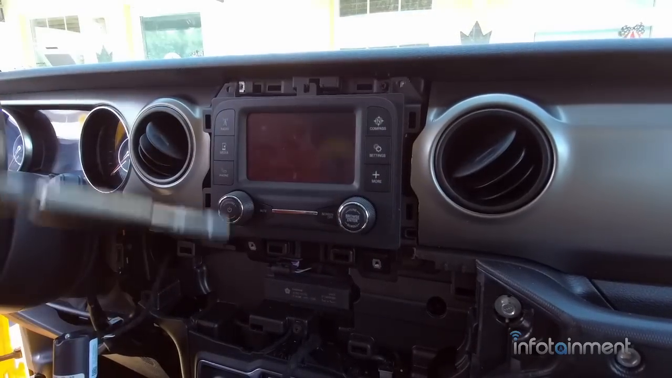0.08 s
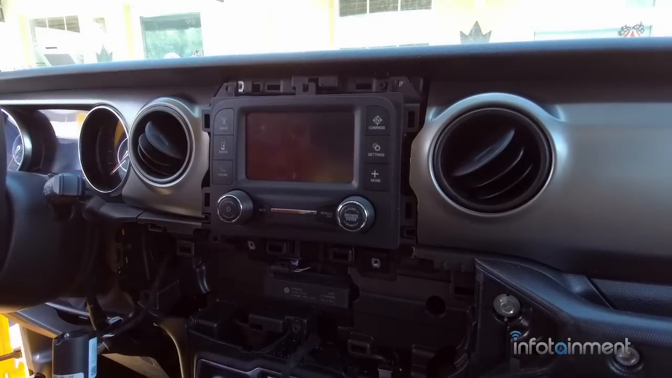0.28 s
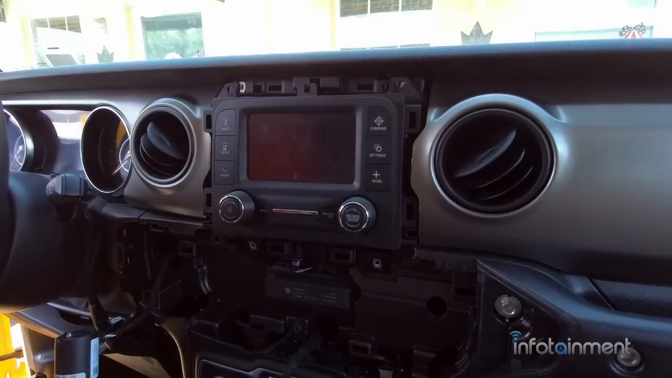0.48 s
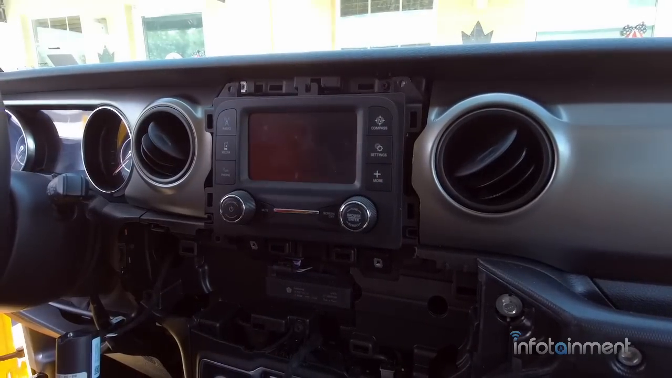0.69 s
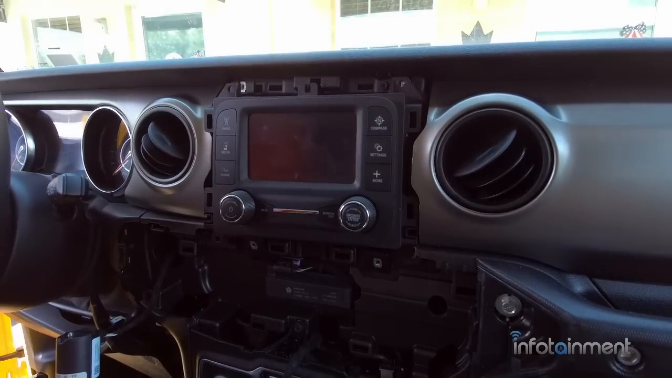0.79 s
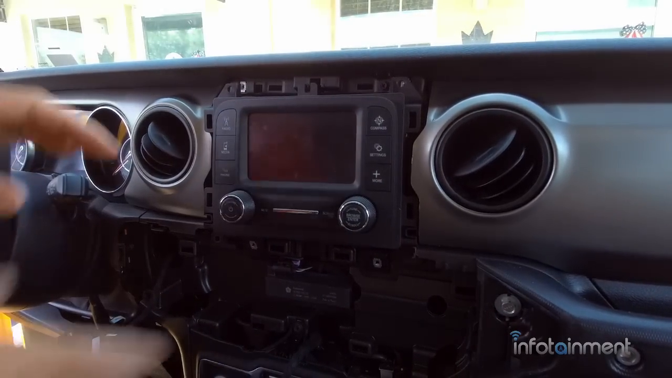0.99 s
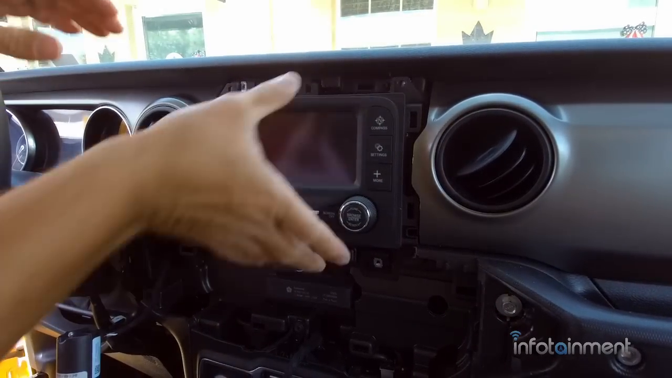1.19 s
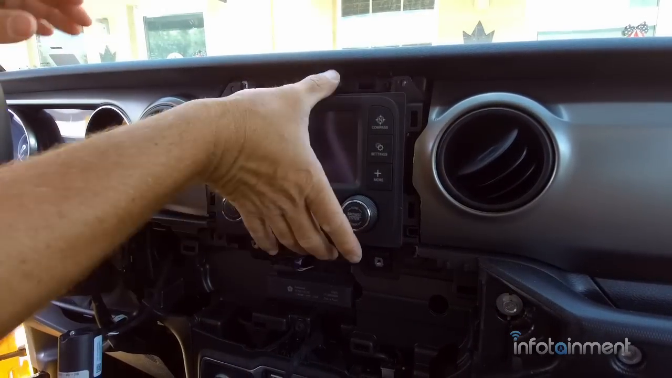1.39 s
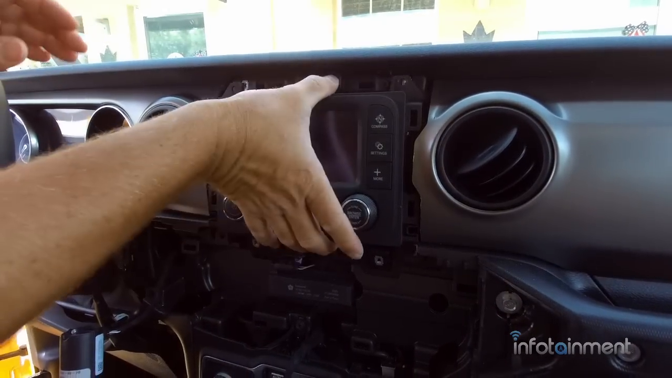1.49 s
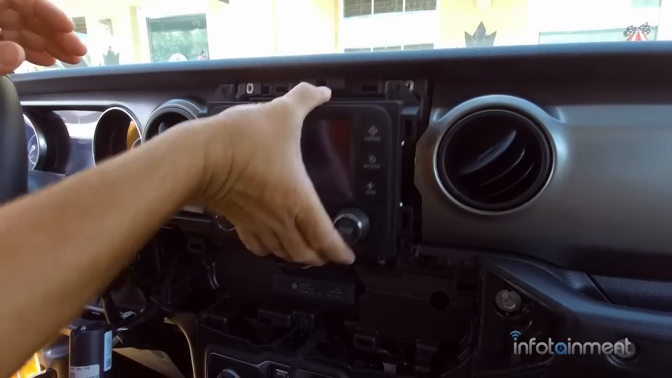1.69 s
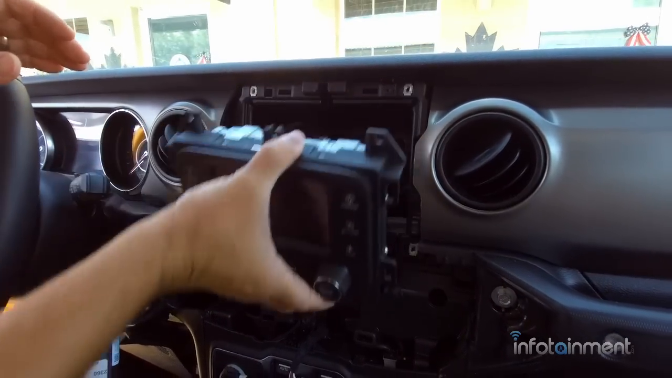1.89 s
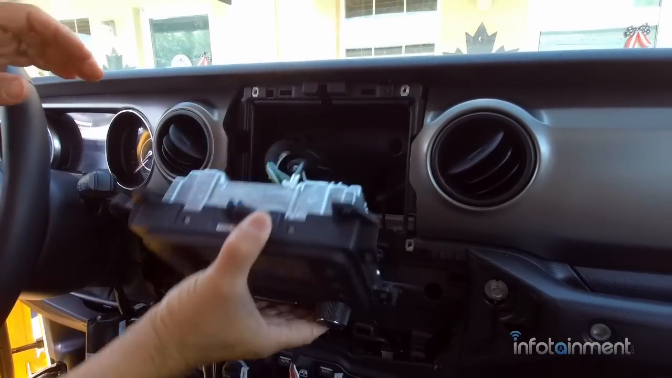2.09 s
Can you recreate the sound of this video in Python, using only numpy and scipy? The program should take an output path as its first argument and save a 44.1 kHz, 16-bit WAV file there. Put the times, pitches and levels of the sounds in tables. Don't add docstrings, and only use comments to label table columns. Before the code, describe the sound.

Loud hollow clatter of a screwdriver put down on plastic, quickly settling, then brushing cloth and crisp panel snaps, later faint touches and clicks, in a small dry vehicle cabin, heard on the left side only.

```python
import sys
import numpy as np
from scipy import signal
from scipy.fft import rfft, irfft
from scipy.io import wavfile
from scipy.ndimage import uniform_filter1d

SR = 44100
rng = np.random.default_rng(int(sys.argv[2]) if len(sys.argv) > 2 else 0)


def transcribe(signal):
    frames = np.atleast_2d(signal).T
    limited = np.clip(frames, -1, 1)
    pcm = np.round(limited * 32767).astype(np.int16)
    wavfile.write(sys.argv[1], SR, pcm)


def convert_level_to_amplitude(level_db):
    exponent = np.asarray(level_db, float) / 20
    return 10 ** exponent


N = 92610


def evened(x):
    return x / np.sqrt(np.mean(x ** 2) + 1e-20)


def add(mix, start_s, sound):
    at = round(start_s * SR)
    sound = sound[max(-at, 0):]
    part = mix[max(at, 0):][:len(sound)]
    part += sound[:len(part)]


def passed(x, hz, kind):
    sos = signal.butter(4, np.clip(hz, 20, 20000), kind, fs=SR, output="sos")
    return signal.sosfilt(sos, x)


def ring(hz, db, t60, phase, t):
    fading = convert_level_to_amplitude(db[:, None] - 60 * t / t60[:, None])
    waves = np.sin(2 * np.pi * (hz[:, None] * t + phase[:, None]))
    x = (fading * waves).sum(0)
    return x / abs(x).max()


def air():
    # f/Hz, density/dB per Hz
    air_colour = [(40, -36), (200, -16.5), (330, -10.5), (480, -6), (1130, -10.5), (2500, -19.5),
                  (6000, -27), (15500, -34.5)]
    # t/s, level/dB
    air_level = [
        (0.0, -49.5),
        (0.19, -57.5),
        (0.33, -51),
        (0.43, -51),
        (1.36, -55.5),
        (1.82, -53.5),
        (2.1, -55),
    ]
    patch_db, flicker_db, air_db = 1.2, 0.5, 2.5
    frames = N // 128 + 6
    real, imag, patches = rng.standard_normal((frames, 257, 3)).T
    flicker = uniform_filter1d(patches, size=60, axis=0)
    flicker = evened(uniform_filter1d(flicker, size=3, axis=1))
    patches = uniform_filter1d(patches, size=5, axis=0)
    patches = evened(uniform_filter1d(patches, size=12, axis=1))
    cells = (real + 1j * imag) * convert_level_to_amplitude(patch_db * patches + flicker_db * flicker)
    wash = signal.istft(cells, nperseg=512, noverlap=384)[1][:N]
    hz = np.fft.rfftfreq(N, 1 / SR)
    colour_hz, colour_db = np.transpose(air_colour)
    colour = convert_level_to_amplitude(np.interp(np.log(hz + 1), np.log(colour_hz + 1), colour_db))
    wash = evened(irfft(rfft(wash) * colour, N))
    s, level_db = np.transpose(air_level)
    return wash * convert_level_to_amplitude(air_db + np.interp(np.arange(N) / SR, s, level_db))


def hum():
    # f/Hz, width/Hz, level/dB
    hum_tones = [(236, 6, -63.5), (465, 6, -65), (545, 14, -70), (695, 14, -70), (158, 8, -80),
                 (4750, 300, -79)]
    hz = np.fft.rfftfreq(N, 1 / SR)
    white = rfft(rng.standard_normal(N))
    out = np.zeros(N)
    for centre_hz, width_hz, db in hum_tones:
        band = white / (1 + (2 * (hz - centre_hz) / width_hz) ** 2)
        out += convert_level_to_amplitude(db) * evened(irfft(band, N))
    return out


def rustles():
    # t/s, length/s, level/dB, brightness/dB per octave
    strokes = [
        (0.429, 0.074, -49.5, -8),
        (0.518, 0.21, -52, -10),
        (0.714, 0.093, -49, -12),
        (0.868, 0.03, -48, -11),
        (1.4, 0.039, -54.5, -22),
        (1.579, 0.062, -50.5, -21),
        (1.844, 0.047, -57, -8),
        (1.915, 0.14, -63.5, 6),
    ]
    grains_per_s, grain_db = 2500, 5
    out = np.zeros(N)
    for s, length_s, db, tilt_db in strokes:
        draw = rng.random((SR // 2, 3))[:round(length_s * SR)]
        n = len(draw)
        is_grain = draw[:, 1] < grains_per_s / SR
        size = convert_level_to_amplitude(-grain_db * np.log(draw[:, 2] + 0.0011))
        grains = (draw[:, 0] - 0.5) * (0.77 + is_grain * size)
        hz = np.fft.rfftfreq(n, 1 / SR)
        colour = convert_level_to_amplitude(tilt_db * np.log2(hz / 3000 + 0.73)) * (hz / (hz + 900)) ** 2
        hiss = irfft(rfft(grains) * colour, n)
        stroke = np.sin(np.pi * np.arange(n) / n) ** 0.24
        add(out, s, convert_level_to_amplitude(db) * evened(hiss) * stroke)
    return out


def crackles():
    # t/s, peak/dB, lowest f/Hz, t60/s
    bursts = [(.009, -41, 2000, 0.016), (.055, -72, 9000, .02), (0.0635, -49.5, 5960, 0.051),
              (.076, -53.5, 10000, 0.033), (0.1182, -42, 5000, 0.019), (0.116, -56, 8000, 0.027),
              (0.138, -44, 4970, 0.052), (0.143, -55, 5970, .02), (0.152, -48, 7950, 0.024),
              (0.228, -28, 11200, 0.031), (0.253, -43, 9000, 0.019)]
    t, out = np.arange(SR // 10) / SR, np.zeros(N)
    for s, db, lowest_hz, t60 in bursts:
        noise = evened(passed(rng.standard_normal(len(t)), lowest_hz, "high"))
        add(out, s, convert_level_to_amplitude(db - 60 * t / t60) * noise * np.minimum(t / 0.00016, 1))
    return out


def snaps():
    # t/s, peak/dB, centre f/Hz, t60/s, low body/dB
    panel_snaps = [(.373, -40, 2100, .02, -30), (.378, -37, 2050, .02, -30), (.494, -41, 2100, .02, -20),
                   (.511, -38, 2050, .025, -30), (.6745, -38, 2600, .015, -30), (.727, -39, 1800, .02, -20),
                   (.769, -35, 1900, .02, -15), (.775, -33, 1900, .02, -8), (.778, -33, 2050, .015, -8),
                   (.7798, -22.5, 2100, .016, -13), (.7835, -30, 2050, .02, -15),
                   (.8185, -35, 1600, .025, -15), (.8255, -34, 1600, .02, -15),
                   (.827, -29.5, 2330, .016, -10), (.8365, -32, 2300, .014, -8),
                   (.8883, -22, 1540, .022, -22), (.8925, -37, 1750, .04, -8),
                   (.9095, -34, 1800, .012, -20), (.9114, -19.5, 1460, .028, -17),
                   (.9168, -32, 1410, .03, -12), (.9225, -33, 1450, .025, -9), (1.586, -43, 1900, .03, -15),
                   (1.594, -41, 1950, .04, -12), (1.607, -42, 1900, .03, -8), (1.622, -43, 1400, .04, -8),
                   (1.835, -46, 1700, .04, -15), (1.857, -45, 1750, .03, -15), (2.01, -45, 1780, .04, -25)]
    panel_hz = np.array([460, 900, 1410, 1580, 1820, 2050, 2330, 2660, 3150, 3800, 4650, 5850])
    fall_db_per_octave, far_db = 42, -21
    body_hz, body_ring = 1100, 2.2
    rise_s, snap_db, puff_db = 0.0012, -2.5, -19
    t, out = np.arange(SR // 8) / SR, np.zeros(N)
    low = panel_hz < body_hz
    for s, db, hz, t60, body_db in panel_snaps:
        draw, noise = rng.standard_normal((2, len(low))), rng.standard_normal(len(t))
        near_db = np.maximum(-fall_db_per_octave * abs(np.log2(panel_hz / hz)), far_db)
        low_db = body_db + 4 * np.log2(panel_hz / 900)
        mode_db = np.where(low, low_db, near_db) + draw[1]
        mode_t60 = t60 * np.where(low, body_ring, 1)
        phase = 0.25 - panel_hz * rise_s
        modes = ring(panel_hz * (1 + 0.012 * draw[0]), mode_db, mode_t60, phase, t)
        puff = evened(passed(passed(noise, 0.6 * hz, "high"), 2.8 * hz, "low"))
        puff = puff * convert_level_to_amplitude(puff_db - 60 * t / t60)
        snap = np.minimum(t / rise_s, 1) * (modes + puff)
        add(out, s, convert_level_to_amplitude(db + snap_db) * snap / abs(snap).max())
    return out


def ticks():
    # t/s, peak/dB, t60/s, brightness/dB per octave
    hits = [(0.1718, -32, 0.0067, -1), (0.1761, -9, 0.017, -1.5), (.181, -20, 0.04, -1),
            (0.1895, -27, 0.03, -4), (.2032, -11, 0.03, -1), (0.2074, -21, 0.04, -2), (.215, -21, 0.04, 0),
            (.2275, -24, .03, 0), (0.2296, -15, 0.03, -2), (.2325, -22, .07, -2), (0.2665, -24, 0.03, -3),
            (0.2755, -24, 0.04, 3), (.2825, -28, .05, -3), (0.2959, -24.5, .05, -9), (0.301, -29, 0.03, 2),
            (0.3198, -33, 0.015, -2), (.3432, -30.5, 0.045, -2), (0.358, -38, 0.03, -6),
            (.3945, -30.5, 0.026, -4), (0.419, -30, 0.04, -2.5), (0.468, -41, 0.022, -7.5),
            (.888, -38, 0.03, 4), (0.9114, -36, 0.06, 4)]
    # f/Hz, level/dB, t60/s
    case_modes = [(1616, 2.5, 0.06), (2157, -5.5, 0.05), (2396, 5, 0.025), (2593, 8.5, 0.018),
                  (3063, 2.5, 0.057), (3080, -8.5, 0.078), (3470, -36, 0.049), (4300, -32, 0.087),
                  (5050, -28, 0.06), (6800, -34, 0.07), (7140, -26, 0.022), (8260, -6, 0.012)]
    spread_db = 3.5
    crack_db, crack_hz, crack_share = -7.5, 2000, 0.61
    t, out = np.arange(SR // 8) / SR, np.zeros(N)
    hz, mode_db, mode_t60 = np.transpose(case_modes)
    for s, db, t60, tilt_db in hits:
        draw, noise = rng.standard_normal((3, len(hz))), rng.standard_normal(len(t))
        hit_db = mode_db + tilt_db * np.log2(hz / 2500) + spread_db * draw[1]
        modes = ring(hz * (1 + 0.031 * draw[0]), hit_db, np.minimum(mode_t60, t60), 0 * hz, t)
        middle = passed(passed(noise, crack_hz, "high"), 6000 * convert_level_to_amplitude(tilt_db), "low")
        fizz = 0.093 * convert_level_to_amplitude(0.77 * tilt_db) * passed(noise, 9200, "high")
        crack = evened(middle + fizz) * convert_level_to_amplitude(crack_db - 60 * t / (crack_share * t60))
        add(out, s, convert_level_to_amplitude(db) * (modes + crack) * np.minimum(t / 0.00021, 1))
    return out


def dying_modes(modes, t):
    return sum(convert_level_to_amplitude(db - 60 * t / t60) * np.sin(2 * np.pi * hz * t) for hz, db, t60 in modes)


def knocks():
    # t of peak/s, peak/dB, f/Hz
    landings = [(.002, -34.5, 330), (.0075, -44, 393), (.011, -30.5, 720), (0.014, -30.5, 406),
                (0.023, -40, 285), (.1153, -31.5, 870), (0.1172, -33.5, 435), (.178, -28, 810),
                (.1935, -25.5, 740), (.2055, -17.5, 900), (0.2133, -2.5, 890), (.229, 0.46, 930),
                (.2395, -15, 940), (.2447, -41, 850), (.2687, -5.5, 882), (0.2773, -11.5, 920),
                (0.2829, -3, 960), (.298, -13, 880), (0.3067, -16.5, 910), (0.319, -26, 500),
                (0.3224, -25, 910), (.3452, -24, 910), (.3505, -43, 590), (.3625, -29, 706),
                (.3965, -28.5, 900), (.4005, -40, 700), (.413, -31, 820), (0.4205, -24.5, 873),
                (.4235, -36, 655), (.4702, -32.5, 830), (.4735, -44, 650), (1.86, -37.5, 645)]
    # delay/s, level/dB
    flutter = [
        (.0054, -11),
        (.0104, -18),
        (.0156, -25),
        (.0205, -29),
    ]
    # f/Hz, level/dB, t60/s
    tray_modes = [(639.6, -24, 0.17), (707.5, -18, 0.062), (759.9, -10.5, 0.04), (833, -9, 0.018),
                  (908.4, -35, 0.16), (1090, -27, 0.077), (1176, -26.5, 0.17)]
    # f/Hz, level/dB, t60/s
    console_modes = [(126, -56, 0.23), (253, -33.5, 0.094), (330, -32.5, 0.12), (420.4, -22, 0.11),
                     (500, -25.5, 0.083)]
    width_s, walls_rise_s, boom_rise_s = 0.00105, 0.008, 0.019
    t = np.arange(-0.005, 0.005, 1 / SR)
    hollow, blows = np.zeros(N), np.zeros(N)
    for s, db, hz in landings:
        cycles = np.exp(-0.5 * (t / width_s) ** 2) * np.cos(2 * np.pi * hz * t)
        add(hollow, s + t[0], convert_level_to_amplitude(db) * cycles)
        add(blows, s, convert_level_to_amplitude(db) * np.ones(1))
    u = np.arange(SR // 4) / SR
    body = dying_modes(tray_modes, u) * np.minimum(u / walls_rise_s, 1) * 0.05
    body[0] = 1
    for delay_s, db in flutter:
        body[round(delay_s * SR)] += convert_level_to_amplitude(db)
    boom = dying_modes(console_modes, u) * np.minimum(u / boom_rise_s, 1)
    return (signal.fftconvolve(hollow, body) + signal.fftconvolve(blows, boom))[:N]


def cabin(x):
    t60_s, treble_t60_s = 0.09, 0.06
    t, taps = np.arange(SR // 3) / SR, np.zeros(SR // 3)
    at = np.arange(100, len(taps) - 20, 20)
    taps[at + rng.integers(0, 20, len(at))] = rng.choice([-1., 1.], len(at))
    lows = passed(taps, 1860, "low") * convert_level_to_amplitude(-60 * t / t60_s)
    highs = passed(taps, 1930, "high") * convert_level_to_amplitude(-60 * t / treble_t60_s)
    tail = lows + highs
    return signal.fftconvolve(x, tail / np.linalg.norm(tail))[:N]


def scene():
    cabin_db, tray_wet_db = -9, -14
    dull = knocks()
    sharp = ticks() + crackles() + snaps()
    wet = convert_level_to_amplitude(cabin_db) * cabin(sharp + convert_level_to_amplitude(tray_wet_db) * dull)
    left = dull + sharp + wet + rustles() + air() + hum()
    return np.array([left, np.zeros(N)])


def top_cut(x):
    return signal.sosfilt(signal.butter(12, 16520, fs=SR, output="sos"), x)


def record(dry):
    top_hz, top_db, bass_hz, ceiling = 15300, -23, 90, 0.95
    hz = np.fft.rfftfreq(N, 1 / SR)
    top = convert_level_to_amplitude(top_db * np.clip((hz - top_hz) / 400, 0, 1))
    colour = top / (1 + (bass_hz / (hz + 1)) ** 2)
    mix = np.clip(irfft(rfft(dry) * colour, N), -ceiling, ceiling)
    return top_cut(mix)


dry = scene()
out = record(dry)
transcribe(out)
```